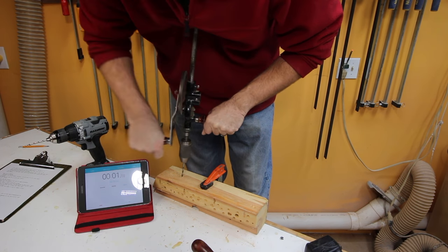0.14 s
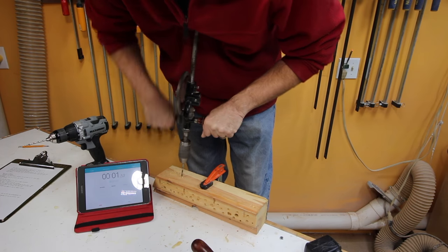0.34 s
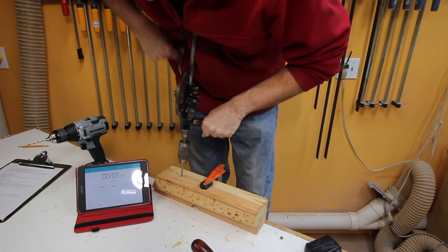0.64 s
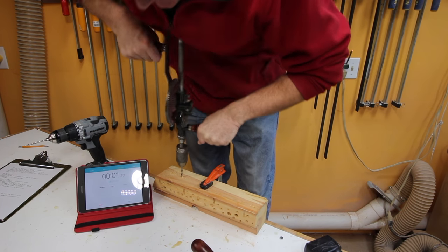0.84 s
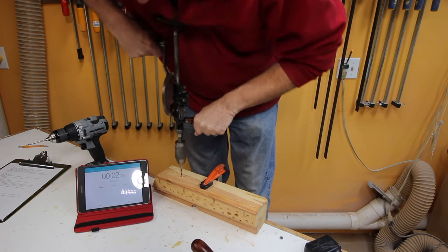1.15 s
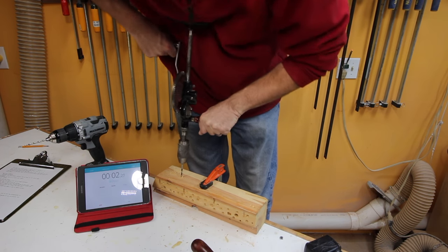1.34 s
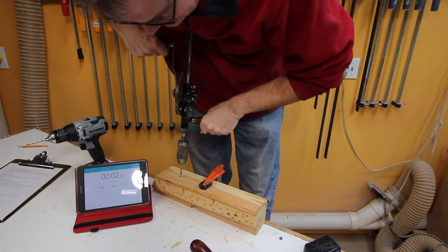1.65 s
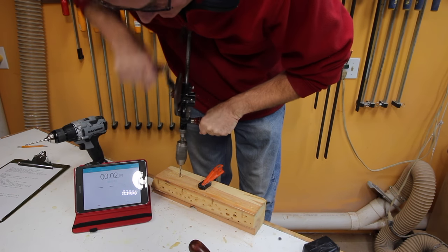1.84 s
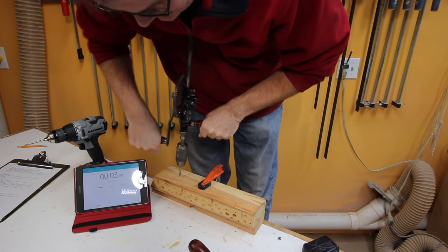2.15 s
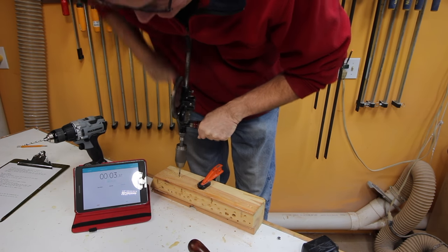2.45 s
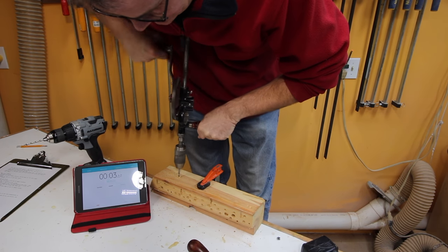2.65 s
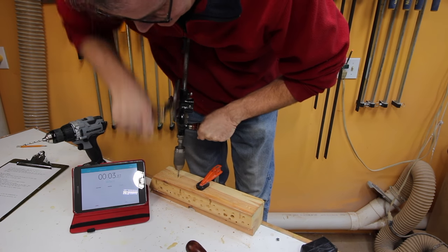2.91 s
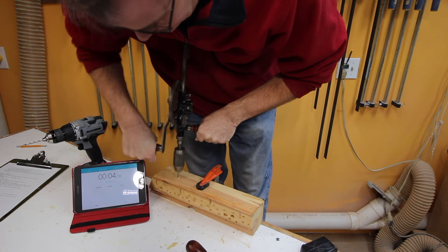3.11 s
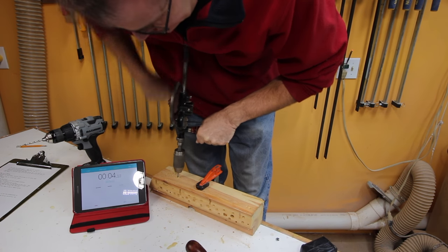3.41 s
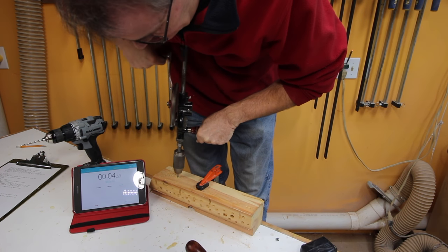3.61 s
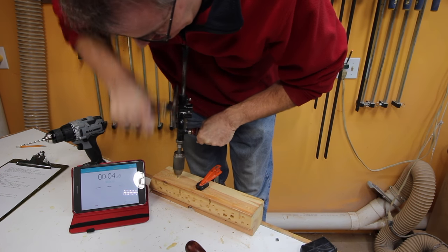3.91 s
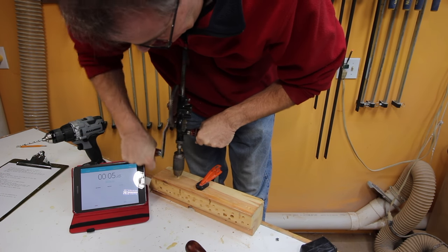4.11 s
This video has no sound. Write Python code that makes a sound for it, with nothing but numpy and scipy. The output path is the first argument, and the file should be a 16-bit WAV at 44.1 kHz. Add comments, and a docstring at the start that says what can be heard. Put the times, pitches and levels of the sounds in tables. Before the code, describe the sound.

A hand drill is cranked in uneven surges on a clamped beam. Metal teeth click and rattle over woody grinding and low, short booms from the bench. A pause leaves quiet room air, faint crackle and one sharp clack of the crank wheel, before denser clicking and growling resume until the end. Close, mostly direct sound with slight workshop reverberation and a dull extreme top.

```python
"""A hand-cranked drill bores a softwood beam on a workshop bench, heard with the direct sound above the shop's tail.
From the start the beam growls, gear teeth click and ring the steel, the bench booms in short throbs as the bit
catches and fibres crackle; at 0.8 s the crank stops with a soft jolt of the bench. In the lull, at 1.5 s, the
crank wheel takes up its slack with a clack. From about 1.9 s the drilling is strong again, and the beam's middle
modes grow freer, most of all near the far side at 3.9 s. Noise and impacts drive the modes; low sines throb."""
import sys
import numpy as np
from scipy import signal
from scipy.fft import rfft, irfft, next_fast_len
from scipy.io import wavfile
from scipy.ndimage import uniform_filter1d, map_coordinates

SR = 44100
rng = np.random.default_rng(int(sys.argv[2]) if len(sys.argv) > 2 else 0)


def log_audio(samples):
    """Write samples as a 16-bit WAV file to the path given in sys.argv[1]."""
    # one column per channel
    frames = np.atleast_2d(samples).T
    # limit to full scale, then quantise
    limited = np.clip(frames, -1, 1)
    pcm = np.round(limited * 32767).astype(np.int16)
    wavfile.write(sys.argv[1], SR, pcm)


N = 188174

# Quiet air of the shop. Each row: frequency in Hz, relative density in dB per Hz.
SHOP_AIR = [(18, -29), (30, -4), (90, 6), (189, 16.5), (1130, -2), (1460, -4), (2060, -2.5), (2830, -18),
            (3490, -16), (10800, -44), (16000, -47)]
AIR_DB = -46.5
# Cranking effort. Each row: time in seconds, beam growl in dB before its trim, gear rattle in dB.
EFFORT = [(0, -24.5, -34), (0.1, -33.5, -44.5), (0.2, -22.5, -30), (0.31, -36, -40.5), (0.42, -27.5, -43.5),
          (0.54, -29.5, -44.5), (0.6, -27.5, -38), (0.67, -35.5, -57), (0.76, -29, -40.5),
          (0.84, -40, -50.5), (1.05, -69, -65), (1.2, -52.5, -58), (1.3, -38, -40), (1.42, -39.5, -62.5),
          (1.75, -51.5, -60.5), (1.9, -33, -47.5), (2.1, -23, -26), (2.18, -28.5, -33.5),
          (2.25, -46.5, -69), (2.38, -24.5, -36), (2.5, -24, -41), (2.7, -31, -45.5), (2.84, -32.5, -51),
          (2.9, -27, -41), (2.97, -32, -47.5), (3.12, -21, -29), (3.18, -42, -52), (3.26, -33.5, -52),
          (3.36, -22, -44), (3.5, -26, -41), (3.63, -23.5, -42), (3.7, -36, -53.5), (3.932, -31.5, -49),
          (3.945, -18, -43), (4.0, -24, -56), (4.08, -17, -45), (4.18, -25, -37.5), (4.27, -32.5, -65)]
# Modes of the wood beam, low to high. Each row: frequency in Hz, width in Hz, relative strength in dB.
BEAM_MODES = [(136, 29, -5), (211.4, 19.6, 3.5), (260.3, 61, -1), (384, 43.7, 3), (461.5, 17, -2.5),
              (511, 52.5, -4), (629.5, 24, -1), (702, 92, -10.5), (964, 80, -13.5), (1129, 110, -13),
              (1212, 95, -14), (1473, 210, -18.5)]
# Modes of the gears and steel frame. Each row: frequency in Hz, width in Hz, relative strength in dB.
STEEL_MODES = [(2158, 440, 2.5), (3155, 250, -4), (3560, 270, -0.5), (4100, 396, 0), (6020, 360, -3.5),
               (5800, 415, 5), (6480, 260, -5), (7685, 540, -5), (7900, 270, -34), (10250, 930, -34),
               (10400, 160, -15), (13500, 400, -45)]
# Colour of crackling and tearing fibres. Each row: frequency in Hz, relative density in dB per Hz.
FIBRE_COLOUR = [(3000, 3), (6000, 4), (9000, 3), (13000, -1), (15500, -4), (15900, -27)]
# Slow level of the fibre crackle, before the gears sway it. Each row: time in seconds, level in dB.
CRACKLE_LEVEL = [(0, -46), (.3, -45.5), (.6, -44), (1, -48.5), (1.5, -44.5), (2.1, -49.5), (2.6, -47.5),
                 (3.1, -50), (3.5, -49), (3.85, -48.5), (4, -58), (4.27, -67)]
CRACKLE_FOLLOWS = 0.49  # share of the gears' swing in dB that the crackle follows
# Balance of the beam's middle modes over the low ones: it rises as the hole deepens, and steps up near the far side.
HOLLOW_DB, HOLLOW_DB_PER_S = -5.5, 0.74
THROUGH_S, THROUGH_DB = 3.89, 5
# Low colour of the swaying bench. Each row: frequency in Hz, relative density in dB per Hz.
SWAY_COLOUR = [(15, -23), (30, -9), (65, 13), (100, 3), (150, -29.5)]
SWAY_DB, SWAY_FOLLOWS, SWAY_SMOOTH_S = -48.5, 0.31, 0.17  # level, share of the effort's swing, smoothing

# The loud gear teeth. Each row: time in seconds, level in dB before a slight trim.
LOUD_TEETH = [(0.0173, -21), (0.0747, -24), (0.085, -20.5), (0.1111, -24), (0.1353, -17), (0.1673, -6.5),
              (0.2369, -14), (0.3623, -24), (0.3892, -24), (0.4863, -16.5), (0.5611, -24.5),
              (0.5794, -20.5), (0.6898, -29), (0.7141, -19.5), (0.7543, -15.5), (0.9343, -34),
              (1.2582, -26), (1.3064, -17), (1.385, -23.5), (1.4167, -33), (1.4435, -20.5), (1.489, -4),
              (1.7888, -24), (1.8766, -34), (1.918, -27), (1.9461, -23), (1.9727, -11.5), (1.9852, -11),
              (2.0265, -16.5), (2.0463, -19), (2.0667, -11.5), (2.0937, -15), (2.1097, -11),
              (2.1362, -11.5), (2.1545, -19.5), (2.1687, -13.5), (2.316, -34), (2.3483, -21), (2.369, -16),
              (2.396, -16), (2.4137, -13.5), (2.431, -20), (2.4929, -10), (2.5975, -23.5), (2.623, -21.5),
              (2.777, -10.5), (2.8739, -16.5), (2.8948, -13.5), (2.9204, -19), (2.991, -26), (3.0126, -15),
              (3.042, -8.5), (3.052, -4.5), (3.0902, -14.5), (3.1074, -18), (3.276, -24), (3.3081, -17),
              (3.3376, -21), (3.3715, -10.5), (3.4344, -27), (3.5362, -27), (3.5699, -19.5), (3.6021, -12),
              (3.6134, -11.5), (3.7638, -30), (3.8262, -29.5), (3.889, -31), (3.9385, -24), (3.9557, -23),
              (4.021, -19.5), (4.0408, -15), (4.0734, -15.5), (4.1198, -19.5), (4.1434, -13.5)]
KNOCK_DB = -18  # knock on the beam for a -15 dB tooth at -27.5 dB growl
KNOCK_PER_TOOTH, KNOCK_PER_GROWL = 0.47, 0.32  # shares of each one's swing in dB
# Rattly rings of the crank wheel. Each row: frequency in Hz, width in Hz, relative strength in dB.
WHEEL_MODES = [(5320, 230, 1), (8540, 190, 4), (8300, 290, -23), (9900, 220, -2), (13400, 180, -6)]
# Fibres tearing. Each row: time in seconds, burst level in dB before colouring.
FIBRE_SNAPS = [(0.167, -29), (0.2019, -30), (0.346, -24.5), (0.483, -24.5), (0.5162, -27), (0.5611, -32),
               (0.5781, -22.5), (0.6887, -23.5), (0.7577, -18.5), (1.257, -21), (1.3296, -21),
               (1.489, -7.5), (1.9852, -22.5), (2.3266, -35), (2.4932, -29), (2.6714, -28), (2.7766, -37),
               (2.801, -29), (2.9193, -14), (3.0245, -26), (3.041, -21), (3.3722, -31), (3.4572, -27),
               (3.5707, -23.5), (3.8497, -27), (4.041, -36)]
EDGE_DB = -28  # bright edge under each loud tooth, relative to the tooth
SNAP_LOW_HZ = 4470  # snaps are thin: little below this
# The bit catches. Each row: time in seconds, level in dB before a slight trim.
BIT_CATCHES = [(0.056, -15.5), (0.088, -15), (0.164, -17.5), (0.199, -11), (0.263, -16), (0.306, -18),
               (0.37, -15), (0.471, -16), (0.574, -19.5), (0.697, -17.5), (0.765, -18), (0.942, -30.5),
               (1.227, -30.5), (1.264, -26), (1.305, -21), (1.398, -28), (1.491, -27.5), (1.798, -29.5),
               (1.842, -27), (1.888, -23), (1.927, -14), (1.992, -7.5), (2.057, -9), (2.119, -10),
               (2.317, -19), (2.373, -12.5), (2.469, -11), (2.583, -17), (2.631, -23), (2.667, -13),
               (2.723, -21), (2.78, -21), (2.873, -16), (2.921, -12), (2.995, -18), (3.051, -6.5),
               (3.118, -10), (3.194, -22.5), (3.29, -14.5), (3.342, -8.5), (3.421, -14), (3.515, -16.5),
               (3.605, -10), (3.727, -20.5), (3.777, -17), (3.893, -14.5), (3.944, -21), (4.042, -15),
               (4.146, -14.5), (4.213, -24)]
BENCH_HZ, BENCH_SCATTER_HZ = 202.9, 4.84  # low mode of the bench top, small random pitch scatter per throb
JOLT_S, JOLT_DB, JOLT_HZ, JOLT_T60_S = 0.81, -19, 54, 0.04
CLACK_S, CLACK_RING_DB, CLACK_THUD_DB = 1.4895, -11.5, -16.5  # the thud is in the beam
# Decay of the room. Each row: frequency in Hz, time to fall 60 dB in seconds.
SHOP_DECAY = [(200, 0.76), (1000, 0.42), (4000, 0.22), (9000, 0.24), (15000, 0.053)]
TOP_HZ = 16800


def amp(db):
    """Gain of a level in dB."""
    return 10 ** (np.asarray(db) / 20)


def unit(x):
    """Scaled to rms 1."""
    return x / np.sqrt(np.mean(x ** 2) + 1e-20)


def along(points, hz):
    """(Hz, value) points read on a log frequency axis."""
    f, v = np.transpose(points)
    return np.interp(np.log(hz + 1), np.log(f + 1), v)


def curves(rows):
    """One value per sample for each column after the time."""
    s, *columns = np.transpose(rows)
    return [np.interp(np.arange(N) / SR, s, column) for column in columns]


def wobble(rate):
    """A smooth random curve, rate knots a second."""
    knots = rng.standard_normal(int(N * rate / SR) + 4)
    return map_coordinates(knots, [np.arange(N) * rate / SR])


def filtered(x, response):
    """x through a complex response of frequency."""
    m = next_fast_len(N + SR // 2)
    return irfft(rfft(x, m) * response(np.fft.rfftfreq(m, 1 / SR)), m)[..., :N]


def coloured(x, spectrum):
    """x shaped by (Hz, dB) points, rms 1."""
    return unit(filtered(x, lambda hz: amp(along(spectrum, hz))))


def resonant(x, modes):
    """x through a body of parallel resonances with alternating sign, rms 1."""
    def body(f):
        total = 0
        for k, (centre, width, db) in enumerate(modes):
            mode = 1j * f * width / (centre * centre - f * f + 1j * f * width)
            total = total + (-1) ** k * amp(db) * mode
        return total
    return unit(filtered(x, body))


def add_at(track, s, sound):
    """Lays a short sound into the track at s seconds."""
    track[round(s * SR):][:len(sound)] += sound


def quiet_air():
    """The still shop: steady noise in the colour of its air."""
    return amp(AIR_DB) * coloured(rng.standard_normal(N), SHOP_AIR)


def gritty(spread_db, rate):
    """Rough rubbing: noise whose strength wanders at random, rate knots a second."""
    return rng.standard_normal(N) * amp(spread_db * wobble(rate))


def ticks(rate, spread_db, life):
    """Small contacts at chance moments, rate a second, each a noise burst dying 60 dB in life seconds; rms 1."""
    happens = rng.random(N) < rate / SR
    sizes = happens * amp(spread_db * rng.standard_normal(N).clip(-2, 2))
    decay = amp(-60 * np.arange(SR // 20) / SR / life)
    return unit(signal.fftconvolve(sizes, decay)[:N] * rng.standard_normal(N))


def beam_growl(shake, growl_db, gear_db):
    """The cutter shakes the beam; its low, middle and upper modes answer with separate levels."""
    t = np.arange(N) / SR
    through_db = THROUGH_DB / (1 + np.exp((THROUGH_S - t) / 0.023))
    middle = amp(HOLLOW_DB + HOLLOW_DB_PER_S * t + through_db)
    growl = resonant(shake, BEAM_MODES[:5]) + middle * resonant(shake, BEAM_MODES[5:8])
    growl = growl / np.sqrt(1 + middle ** 2)  # changes the balance, not the power
    chatter_db = (growl_db + gear_db) / 2 - 3.0  # the upper modes answer cutter and gears alike
    return amp(growl_db + 1.5) * growl + amp(chatter_db) * resonant(shake, BEAM_MODES[8:])


def gear_rattle(rattle, gear_db):
    """Rubbing and rattling gears ring the steel; worn teeth meet softly, so their force is dull."""
    force = gritty(spread_db=0.0, rate=520) + 1.57 * rattle
    blunt = filtered(force, lambda hz: 1 / (1 + 1j * hz / 7000) ** 2)
    return amp(gear_db) * resonant(blunt, STEEL_MODES)


def fibre_crackle(gear_db):
    """Small fibres crackle under the cutter: bright noise and ticks, partly following the gears."""
    level_db = curves(CRACKLE_LEVEL)[0] + CRACKLE_FOLLOWS * (gear_db - gear_db.mean())
    crackle = gritty(spread_db=0.0, rate=340) + 0.66 * ticks(rate=53, spread_db=2.0, life=0.0048)
    return amp(level_db) * coloured(crackle, FIBRE_COLOUR)


def cutting():
    """Between the loud teeth: growl, rattle and crackle under one quick judder of level."""
    growl_db, gear_db = curves(EFFORT)
    rattle = ticks(rate=130, spread_db=4.5, life=0.0029)  # loose teeth shake steel and wood alike
    shake = gritty(spread_db=3.0, rate=130) + 0.98 * rattle
    judder = amp(1.5 * wobble(45))
    beam = beam_growl(shake, growl_db, gear_db)
    return judder * (beam + gear_rattle(rattle, gear_db) + fibre_crackle(gear_db))


def bench_sway():
    """The bench sways low: deep noise whose level follows the slow effort."""
    slow_db = uniform_filter1d(curves(EFFORT)[0], round(SWAY_SMOOTH_S * SR))
    level_db = SWAY_DB + SWAY_FOLLOWS * (slow_db - slow_db.mean())
    return amp(level_db) * coloured(rng.standard_normal(N), SWAY_COLOUR)


def struck(modes, damping, scatter_db, scrape):
    """One scraping contact: a force burst dying 60 dB in scrape seconds rings modes of random strength; peak 1."""
    t = np.arange(SR // 4) / SR
    hz, width, db = np.transpose(modes)[:, :, None]
    draw = rng.standard_normal((2, len(modes), 1))
    decay = amp(db + scatter_db * draw[0] - damping * width * t)  # damping: dB a second per Hz of width
    ring = decay * np.sin(2 * np.pi * (hz + 0.25 * width * draw[1]) * t)
    soft = 1 - np.exp(-t * hz / 0.58)  # a mode needs a cycle or two to build up
    force = rng.standard_normal(len(t)) * amp(-60 * t / scrape) * (1 - np.exp(-t / 0.0008))
    blow = signal.fftconvolve((ring * soft).sum(0), force)[:len(t)]
    return blow / np.abs(blow).max()


def loud_teeth():
    """Each loud tooth rings the steel, knocks the beam's upper modes and leaves the loose wheel faintly buzzing."""
    track = np.zeros(N + SR)
    growl_db = curves(EFFORT)[0]
    for s, db in LOUD_TEETH:
        steel = struck(STEEL_MODES, damping=30.8, scatter_db=3.5, scrape=0.0084)
        wood = struck(BEAM_MODES[8:], damping=23.3, scatter_db=5.5, scrape=0.0061)
        buzz = struck(WHEEL_MODES[1:3], damping=15, scatter_db=3, scrape=0.21)
        knock_db = KNOCK_DB + KNOCK_PER_TOOTH * (db + 15)
        knock_db += KNOCK_PER_GROWL * (growl_db[round(s * SR)] + 27.5)
        add_at(track, s, amp(db - 0.63) * steel + amp(knock_db) * wood + amp(db - 27) * buzz)
    return track[:N]


def fibre_snaps():
    """Tearing fibres, and the edge of each loud tooth, are short bright noise bursts."""
    track, t = np.zeros(N + SR), np.arange(SR // 4) / SR
    edges = [(s, db + EDGE_DB) for s, db in LOUD_TEETH]
    for s, db in list(FIBRE_SNAPS) + edges:
        add_at(track, s, amp(db - 60 * t / 0.019) * rng.standard_normal(len(t)))

    def thin(hz):
        return amp(along(FIBRE_COLOUR, hz)) * (1j * hz / (SNAP_LOW_HZ + 1j * hz)) ** 2
    return amp(0.65) * filtered(track[:N], thin)


def bench_throbs():
    """The catching bit pushes the bench top softly, so its low mode swells and fades as a sine."""
    track, t = np.zeros(N + SR), np.arange(SR // 3) / SR
    fade = amp(-60 * t / 0.087) + 0.1 * amp(-60 * t / 0.3)  # the push, then the free ring
    shape = (1 - np.exp(-t / 0.019)) * fade
    shape /= shape.max()
    for s, db in BIT_CATCHES:
        hz = BENCH_HZ + BENCH_SCATTER_HZ * rng.standard_normal()
        add_at(track, s, amp(db - 1.0) * shape * np.sin(2 * np.pi * (hz * t + rng.random())))
    return track[:N]


def bench_jolt():
    """A soft jolt of the bench as the crank stops: one fast-dying low sine."""
    track, t = np.zeros(N + SR), np.arange(SR // 3) / SR
    add_at(track, JOLT_S, amp(JOLT_DB - 60 * t / JOLT_T60_S) * np.sin(2 * np.pi * JOLT_HZ * t))
    return track[:N]


def wheel_clack():
    """The crank wheel takes up its slack: a rattly ring of the wheel and a thud in the beam."""
    track = np.zeros(N + SR)
    ring = struck(WHEEL_MODES, damping=47, scatter_db=2.5, scrape=0.13)
    thud = struck(BEAM_MODES[2:], damping=54, scatter_db=4.0, scrape=0.0068)
    add_at(track, CLACK_S, amp(CLACK_RING_DB) * ring + amp(CLACK_THUD_DB) * thud)
    return track[:N]


def shop(x):
    """The room's answer: each frequency dies at its own speed, each stretch of sound gets its own noise tail."""
    out, hop = np.zeros(N + SR), SR // 8
    for start in range(0, N, hop):
        hz, t, z = signal.stft(rng.standard_normal(SR // 2), SR, nperseg=256)
        decay = amp(-60 * t / along(SHOP_DECAY, hz)[:, None])
        tail = signal.istft(z * decay, SR, nperseg=256)[1]
        wet = signal.fftconvolve(x[start:start + hop], tail / np.linalg.norm(tail))
        out[start + 100:][:len(wet)] += wet  # the room answers 100 samples late
    return out[:N]


def scene():
    """Drill, beam and bench, direct and through the shop, over its quiet air."""
    air = quiet_air()
    cut = cutting()
    clicks = loud_teeth() + fibre_snaps() + wheel_clack()
    boom = bench_sway() + bench_throbs() + bench_jolt()
    room = shop(amp(-6.5) * clicks + amp(-10.5) * cut + amp(-11.5) * boom)
    return (clicks + cut + boom + room + air)[None]


def record(dry):
    """The sound is dull at the very top: it falls steeply near 16 kHz and stops at TOP_HZ."""
    return filtered(dry, lambda hz: amp(along([(15600, 0.0), (16000, -16)], hz)) * (hz < TOP_HZ))


dry = scene()
out = record(dry)
log_audio(out)
```